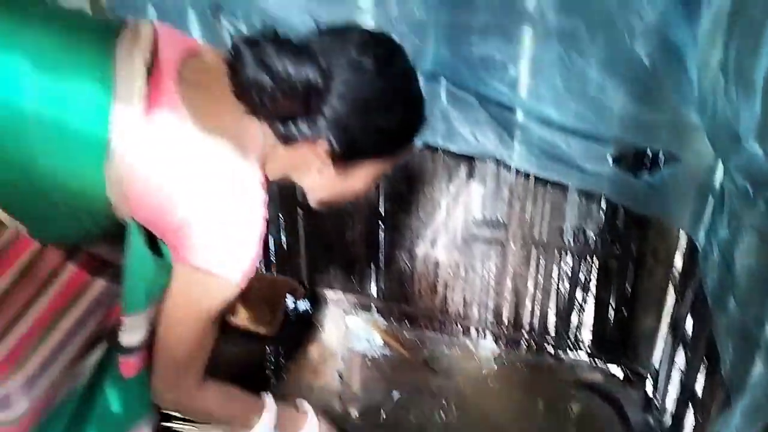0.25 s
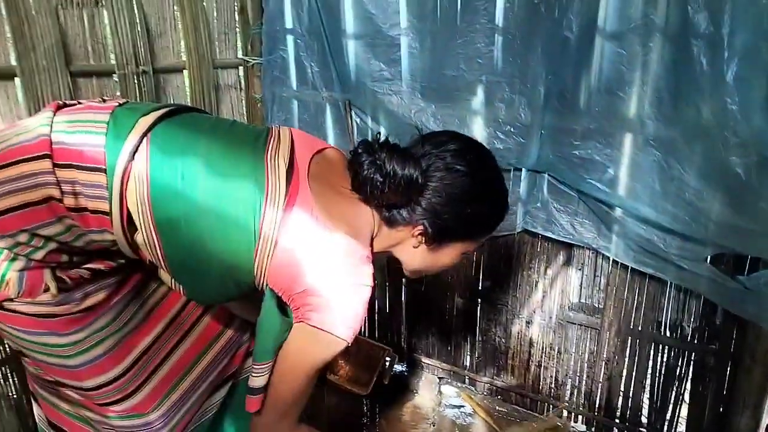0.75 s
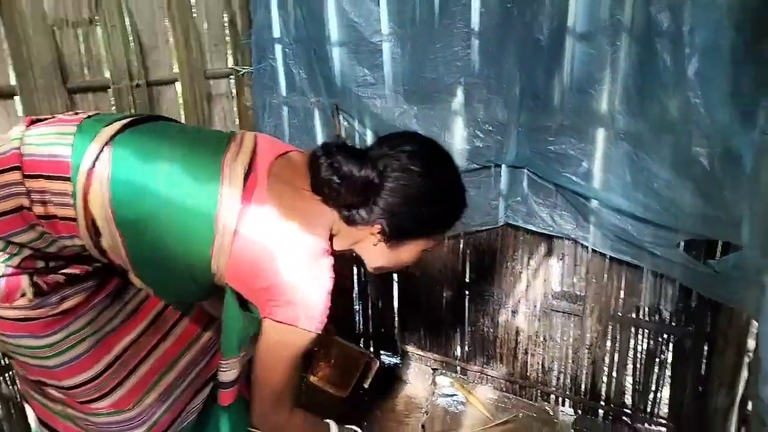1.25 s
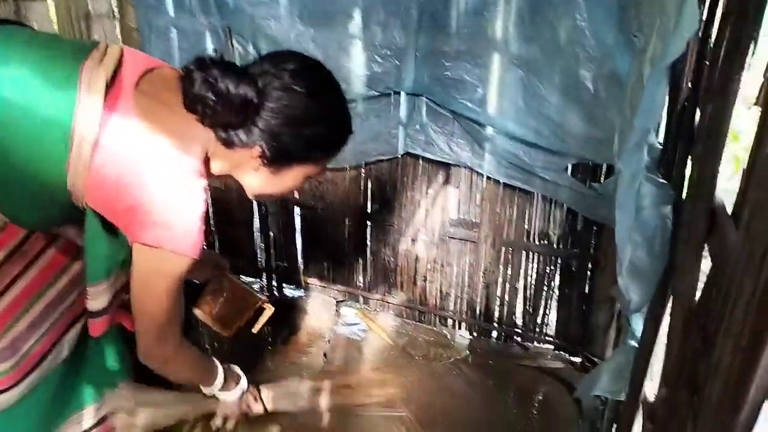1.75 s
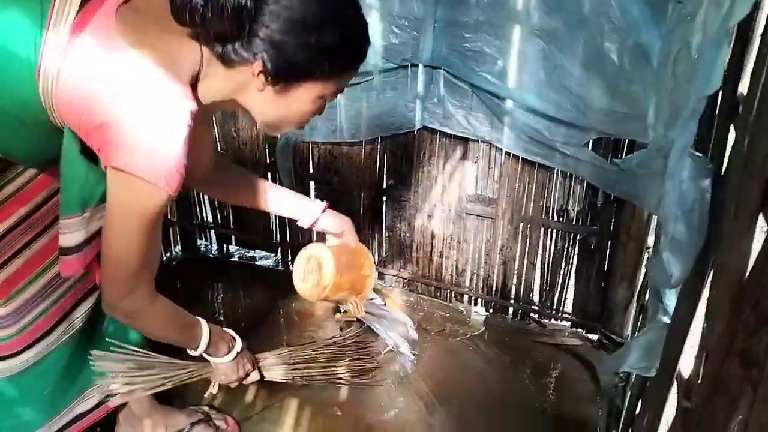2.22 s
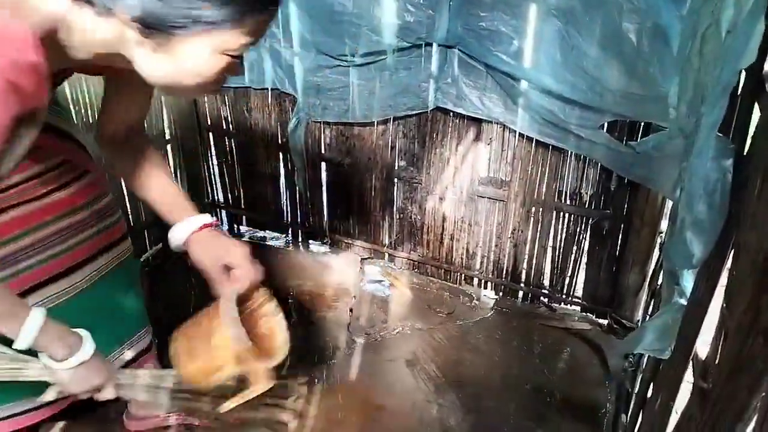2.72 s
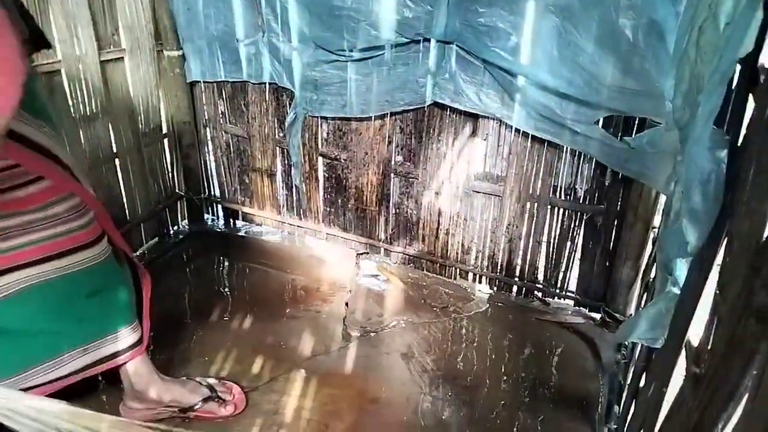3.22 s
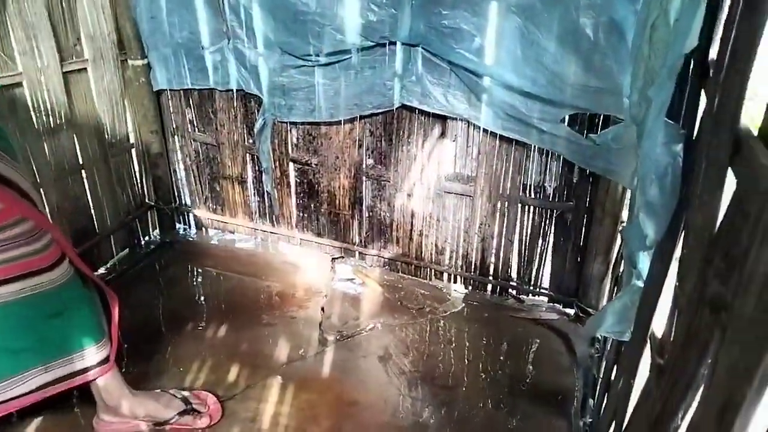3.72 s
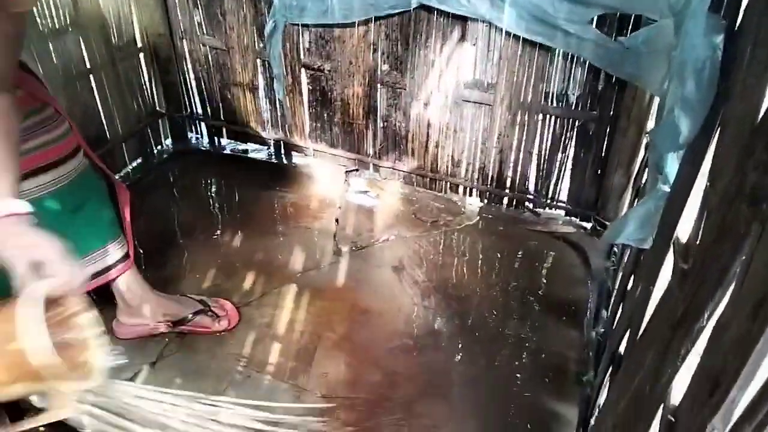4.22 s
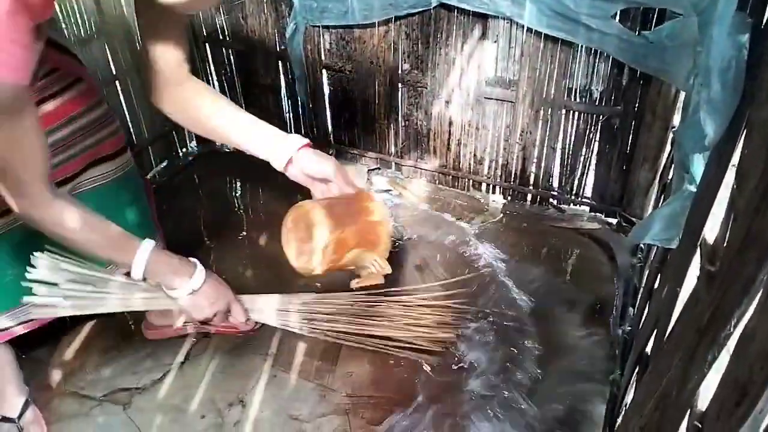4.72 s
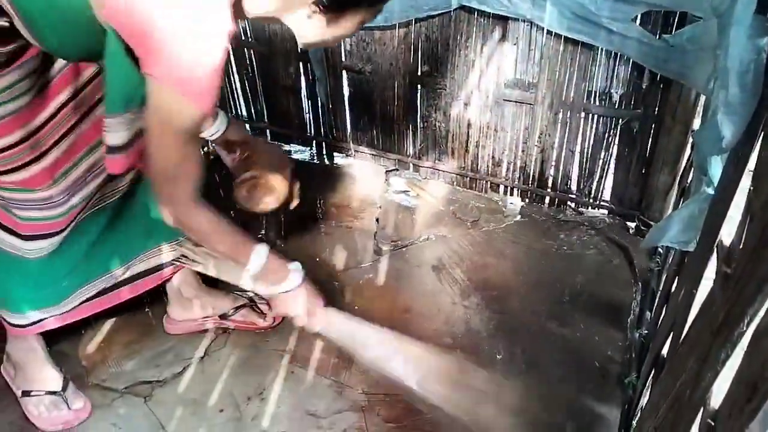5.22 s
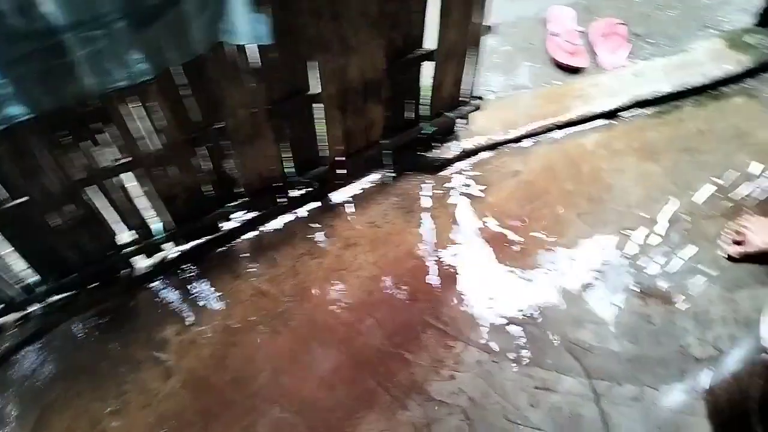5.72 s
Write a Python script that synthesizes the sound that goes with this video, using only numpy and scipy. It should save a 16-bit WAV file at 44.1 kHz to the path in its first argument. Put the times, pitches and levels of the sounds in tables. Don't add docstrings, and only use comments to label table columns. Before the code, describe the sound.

Close up in a small bamboo wash hut, a stick broom scrubs wet cement in bright, crackly swishes with squeaks and plops. It pauses while a plastic mug taps, pours, scoops and is set down with a hollow knock; then water is thrown and softer, wetter sweeping follows. A generator throbs low outside throughout. Close stereo microphone, quick fade at the end.

```python
import sys
import numpy as np
from scipy import signal
from scipy.fft import rfft, irfft, next_fast_len
from scipy.io import wavfile
from scipy.ndimage import uniform_filter1d

SR = 44100
rng = np.random.default_rng(int(sys.argv[2]) if len(sys.argv) > 2 else 0)


def undo_db(level):
    steps = np.asarray(level, float) / 20
    return 10 ** steps


def master_out(mix):
    frames = np.transpose(np.atleast_2d(mix))
    ceiling = np.clip(frames, -1, 1)
    pcm = np.round(ceiling * 32767).astype(np.int16)
    wavfile.write(sys.argv[1], SR, pcm)


N = 263056

STEP_S = .001


def rms_one(x):
    return x / np.sqrt(np.mean(x ** 2) + 1e-20)


def in_time(rows):
    s, *columns = np.transpose(rows)
    return [np.interp(np.arange(N) / SR, s, c) for c in columns]


def colour(x, points, size=4096):
    hz, db = np.transpose(points)
    grid = np.maximum(np.arange(size // 2 + 1) * SR / size, 1)
    cepstrum = irfft(np.log(undo_db(np.interp(np.log(grid), np.log(hz), db))))
    cepstrum[1:size // 2] *= 2
    cepstrum[size // 2 + 1:] = 0
    response = irfft(np.exp(rfft(cepstrum)))
    return signal.fftconvolve(np.atleast_2d(x), response[None], axes=1)[:, :N]


def drift(rate):
    r = np.exp(-2 * np.pi * rate / SR)
    noise = rng.standard_normal(N + 20000)
    return rms_one(signal.lfilter([1], [1, -2 * r, r * r], noise)[20000:])


def band(x, low_hz, high_hz):
    return rms_one(signal.sosfilt(signal.butter(2, [low_hz, high_hz], "band", fs=SR, output="sos"), x))


def grains(per_s, spread_db):
    sizes = undo_db(spread_db * np.minimum(rng.exponential(1, N), 5)) * rng.choice([-1, 1], N)
    return sizes * (rng.random(N) < per_s / SR)


def ring(clicks, hz, t60):
    r, w = undo_db(-60 / (t60 * SR)), 2 * np.pi * hz / SR
    return signal.lfilter([0, np.sin(w)], [1, -2 * r * np.cos(w), r * r], clicks + 1e-18)


def add(out, s, sound):
    i = round(s * SR)
    out[..., i:i + sound.shape[-1]] += sound[..., :N - i]


def pair(likeness):
    mid, side = rng.standard_normal((2, N))
    return np.sqrt(1 + likeness) * mid + np.sqrt(1 - likeness) * side * np.array([[1], [-1]])


def patchy(x, spread_db):
    _, _, cells = signal.stft(x, nperseg=256)
    field = rng.standard_normal(cells.shape[1:])
    for size, axis in ((5, 0), (5, 0), (9, 1), (9, 1)):
        field = uniform_filter1d(field, size=size, axis=axis)
    return signal.istft(cells * undo_db(spread_db * rms_one(field)), nperseg=256)[1][:, :N]


def lag(x, seconds):
    keep = np.exp(-STEP_S / seconds)
    return signal.lfilter([1 - keep], [1, -keep], x)


def background():
    # pitch_hz, density_db (per Hz)
    air_colour = [(18, -53), (30, -13), (80, -16), (124, 5), (153, 33.5), (209, 3), (300, 3), (388, -28.5),
                  (543, -71), (1700, -33), (1980, -23), (7600, -69), (9340, -21), (13100, -65),
                  (14500, -84)]
    far = colour(pair(0.033), [(300, -30), (420, -5), (421, 8.5)])
    air = undo_db(-49.5) * rms_one(colour(far, air_colour)) * undo_db(1.0 * drift(23))
    rumble = undo_db(-47.0) * band(band(pair(0.17), 58, 314), 58, 314)
    insect_hz, insect_width_hz, insect_db = 9000, 920, -53
    low_hz, high_hz = insect_hz - insect_width_hz / 2, insect_hz + insect_width_hz / 2
    chorus = band(rng.standard_normal(N), low_hz, high_hz)
    return air + rumble + undo_db(insect_db) * chorus * undo_db([[3], [-10]])


def generator():
    # multiple (of the firing rate), level_db
    harmonics = [(1, -32), (2, -16), (3, -19), (4, -19), (5, -9), (6, 0), (7, -8), (8, -19), (9, -12),
                 (10, -18), (11, -12), (12, -14), (13, -17), (14, -26), (15, -31)]
    # time_s, level_db
    throb = [(0.0, -35.5), (0.11, -37), (0.48, -36), (0.78, -38.5), (0.81, -36.5), (1.39, -37.5),
             (1.41, -36.5), (2.57, -34.5), (4.47, -34.5), (5.14, -35.5), (5.83, -36.5), (5.88, -46),
             (5.96, -52)]
    # time_s, firing_late_s
    late = [(.1, .0037), (.45, .0037), (1.0, .0005), (1.5, 0), (1.9, .0013), (2.4, .0007), (2.8, .0013),
            (4.9, .0016), (5.8, .0002)]
    firing_hz, first_s = 24.95, .0335
    hunt_s, hunt_period_s, hunt_latest_s = .0008, 1.55, 2.72
    at = np.arange(first_s - 1 / firing_hz, N / SR, 1 / firing_hz)
    hunting = hunt_s * np.cos(2 * np.pi * (at - hunt_latest_s) / hunt_period_s)
    at = at + hunting
    at = at + np.interp(at, *np.transpose(late))
    luck = rng.standard_normal((len(at), 2))
    pulses = np.zeros(N)
    firings = np.clip((at + .0002 * luck[:, 0]) * SR, 0, N - 1).astype(int)
    pulses[firings] = -undo_db(0.4 * luck[:, 1])
    exhaust = colour(pulses, [(k * firing_hz, db) for k, db in harmonics] + [(900, -80)], size=32768)

    size = next_fast_len(N + SR // 10, True)
    hz = np.arange(size // 2 + 1) * SR / size
    reflected_from_hz, reflected_lag_s = 237, .014
    upper = np.clip((hz - reflected_from_hz) / 16 + .5, 0, 1)
    paths = 1 - upper + upper * np.exp(-2j * np.pi * hz * reflected_lag_s)
    chamber_hz, chamber_width_hz = 300, 60
    chamber = np.exp(-2j * np.arctan2(chamber_width_hz * hz, chamber_hz ** 2 - hz ** 2))
    half_beat = .42
    beat = 1 - 1j * half_beat * np.exp(-1j * np.pi * hz / firing_hz)
    beat = beat * np.exp(-.4j) / np.hypot(1, half_beat)
    paths = paths * np.where((hz > 190) & (hz < 310), beat, 1)
    exhaust = irfft(rfft(exhaust, size) * paths * chamber, size)[:, :N]
    return undo_db(in_time(throb)[0]) * rms_one(exhaust) * undo_db([[.5], [-.5]])


def hut(x):
    t60_s = 0.1
    t = np.arange(SR // 3) / SR
    tail = rng.standard_normal((2, len(t))) * undo_db(-60 * t / t60_s) * (t > .004)
    tail = signal.lfilter([.5], [1, -.5], tail)
    tail = tail / np.sqrt(np.sum(tail ** 2, axis=1, keepdims=True))
    return signal.fftconvolve(x, tail, axes=1)[:, :N]


def mug():
    # pitch_hz, level_db, t60_s
    modes = [(496, 0, 0.11), (560, 1, 0.11), (900, -18, .04), (1642, -22, .06), (2040, -18, .05),
             (2715, -4, 0.024)]
    at_s, level_db, bounce_s, bounce_db = 3.6062, -20.5, .0138, -3
    blow = np.zeros(N)
    add(blow, at_s, np.hanning(22) / 10)
    add(blow, at_s + bounce_s, undo_db(bounce_db) * np.hanning(60) / 30)
    body = sum(undo_db(db) * ring(blow, hz, t60) for hz, db, t60 in modes)
    return undo_db(level_db) * signal.sosfilt(signal.butter(3, 380, "high", fs=SR, output="sos"), body)


def knocks():
    # start_s, peak_db, centre_hz, t60_s
    taps = [(2.384, -23, 784, 0.013), (2.39, -21, 795, 0.0063), (2.426, -34, 790, 0.012),
            (4.25, -32.5, 820, 0.011), (4.309, -29, 800, 0.0056)]
    out, click = np.zeros(N), np.r_[np.hanning(16) / 7, np.zeros(SR // 20)]
    for s, db, hz, t60 in taps:
        overtone = 0.16 * ring(click, 2.78 * hz, t60 / 2)
        add(out, s, undo_db(db + 0.5) * (ring(click, hz, t60) + overtone))
    return out


def plops():
    # start_s, peak_db, pitch_hz, t60_s
    stick_plops = [(.0245, -24, 2750, .039), (.037, -25, 3100, 0.04), (.0594, -18.5, 3510, .06),
                   (.159, -25, 2850, 0.04), (.16, -28, 3800, .03), (1.0191, -35, 2000, .04),
                   (1.098, -24, 3570, .04), (1.909, -24, 3390, 0.04), (4.6723, -28, 2240, .036),
                   (4.7441, -24, 2960, .033), (4.777, -24, 2000, 0.057), (4.8294, -25, 1360, .069),
                   (4.8846, -16, 2360, 0.073), (5.025, -29, 3380, 0.061), (5.4894, -22.5, 2420, 0.058),
                   (5.689, -21.5, 1730, .086), (5.7194, -22, 2170, .043), (5.8294, -29, 1530, 0.036),
                   (5.8621, -35, 1960, 0.068)]
    # start_s, peak_db, pitch_hz, t60_s, roughness (0-1)
    gurgles = [(.9682, -14.5, 1560, 0.021, .1), (2.561, -41, 1110, .06, .15), (2.675, -36, 754, 0.11, .02),
               (3.501, -27, 423, .09, 0.2), (3.503, -34, 872, .06, .3), (.961, -30, 1500, .02, .3),
               (3.531, -28, 873, .069, 0.5), (3.635, -32, 480, 0.1, .4), (3.734, -37.5, 453, 0.085, 0.7),
               (3.9, -41, 840, 0.13, .6), (3.994, -42, 1190, .052, 0.2), (4.01, -25, 1080, 0.04, 0.3),
               (4.066, -40, 1026, .082, .1), (5.245, -35, 490, 0.11, 0.28), (5.269, -38, 1020, 0.065, 0.5),
               (5.754, -37, 653, .11, .02), (5.762, -28.5, 1010, 0.073, 0.4),
               (5.779, -40.5, 1170, 0.067, .3)]
    # start_s, peak_db, pitch_hz, t60_s, left_right_db
    drips = [(2.4974, -20, 2050, 0.04, -4), (2.6743, -33, 2290, .064, 3), (3.0794, -40, 3400, .05, -.5),
             (3.496, -34, 1330, .03, -1), (3.503, -33, 2020, .04, 0), (3.497, -34, 2530, .04, 0),
             (3.5254, -30, 2310, .069, 3), (3.5753, -35, 1800, 0.098, 12), (3.5947, -33, 2370, .056, 1.5),
             (3.6294, -39, 2006, .07, 14), (3.8302, -33.5, 2000, .05, 8), (3.92, -34, 2620, .047, -1),
             (3.988, -25, 2300, .042, 2), (2.499, -28, 2600, 0.03, -2), (4.5431, -29, 3250, 0.025, 1.5)]
    rows = [(*row[:4], -2, row[4]) for row in gurgles]
    rows += [(*row, 0.39) for row in drips]
    rows += [(*row, 1.5, 0.43) for row in stick_plops]
    out, t = np.zeros((2, N)), np.arange(SR // 5) / SR
    for s, db, hz, t60, pan_db, rough in rows:
        t60, rough = np.clip(t60, .012, .14), np.clip(rough, 0, 1)
        tone = np.sin(2 * np.pi * hz * t * (1 + 0.094 * t / t60))
        noise = rng.standard_normal((2, len(t)))
        cluster = band(noise, hz / (1.19 + 0.15 * rough), hz * (0.94 + 0.74 * rough))
        swell = (1 - np.exp(-t / 0.00059)) * undo_db(-60 * t / t60)
        level = undo_db(db + 1.0 + np.array([[.5], [-.5]]) * pan_db)
        add(out, s, level * swell * ((1 - rough) * tone + rough * cluster))
    return out


def squeaks():
    # start_s, length_s, level_db,
    # first_pitch_hz, last_pitch_hz
    whistles = [(.012, .05, -27, 2600, 3500), (.016, .025, -28, 1650, 1700), (.065, .04, -25, 6500, 6400),
                (.068, .014, -26, 5750, 5800), (.112, .036, -27, 3200, 3650), (.127, .022, -31, 2450, 2600),
                (.195, .065, -39, 2450, 2100), (.455, .02, -33, 3000, 3050), (.465, .035, -29, 3600, 3800),
                (.58, .055, -26, 3100, 4300), (.946, .02, -30, 3800, 3400), (1.018, .03, -31, 2050, 2000),
                (1.019, .018, -35, 3400, 3500), (1.037, .05, -35, 2500, 3100),
                (1.036, .062, -31, 1850, 2100), (1.17, .055, -24, 3100, 3700),
                (1.332, .025, -30, 2900, 3600), (1.89, .05, -30, 2150, 2500), (1.9, .03, -26, 3300, 3500),
                (2.005, .045, -42, 1200, 1250), (2.155, .05, -31, 225, 240), (2.47, .022, -35, 4200, 4100),
                (3.572, .015, -38, 1500, 1500), (3.59, .012, -35, 1550, 1600), (4.0, .014, -31, 820, 950),
                (4.018, .022, -33, 1050, 800), (4.027, .025, -38, 1800, 2200),
                (4.052, .024, -32, 2400, 2000), (4.065, .015, -40, 1500, 1500),
                (4.075, .014, -36, 2250, 2250), (4.598, .02, -38, 3400, 4100),
                (4.685, .03, -32, 1150, 1250), (4.79, .03, -26, 3300, 2700), (4.89, .015, -28, 3450, 3500),
                (5.16, .025, -36, 1400, 1550), (5.245, .045, -36, 3000, 3050), (5.59, .03, -34, 1200, 1300),
                (5.688, .035, -29, 1300, 1500), (5.79, .02, -30, 1450, 1500), (5.89, .03, -43, 1400, 1350),
                (5.86, .07, -40, 195, 190), (5.93, .05, -45, 128, 128)]
    width, rise = .2, .2
    out = np.zeros((2, N))
    for s, length, db, first_hz, last_hz in whistles:
        u = np.linspace(0, 1, int(np.clip(length, .005, .2) * SR))
        knots = rng.standard_normal((2, 2, 80))
        at = u * min(length * first_hz * width, 79)
        flutter = [[np.interp(at, np.arange(80), k) for k in side] for side in knots + knots[0]]
        flutter = np.array(flutter) / 2
        steady = 600 / first_hz
        turn = np.cumsum(first_hz + (last_hz - first_hz) * u) * 2 * np.pi / SR
        shape = np.sqrt(np.clip(np.minimum(u / rise, (1 - u) / .5), 0, 1))
        whistle = (steady + 2 * flutter[:, 0]) * np.sin(turn) + 2 * flutter[:, 1] * np.cos(turn)
        add(out, s, undo_db(db - 12.5) * shape * whistle)
    return out


def snaps():
    # start_s, peak_db, centre_hz, t60_s, tick_share (0-1)
    bursts = [(0.458, -28, 9000, 0.13, 0.2), (0.946, -25, 8600, 0.054, 0.26),
              (0.9528, -28, 3460, 0.045, 0.37), (1.1237, -29, 9740, 0.06, 0.5),
              (1.6756, -32, 6600, 0.1, 0.3), (1.695, -20, 8850, 0.085, 0.44),
              (2.2877, -42, 9070, 0.06, 0.4), (2.4684, -28.5, 8850, 0.095, 0.43),
              (2.7003, -29.5, 8900, 0.084, 0.53), (3.495, -32, 3280, 0.06, 0.6),
              (3.5212, -33, 3700, 0.15, 0.48), (3.605, -28, 3700, 0.072, 0.35),
              (3.9038, -33.5, 7750, 0.074, 0.63), (4.0752, -32.5, 6800, 0.059, 0.4),
              (4.2006, -41, 8770, 0.06, 0.4), (4.2507, -40.5, 3670, 0.055, 0.3),
              (4.3104, -48.5, 9320, 0.049, 0.5), (4.3676, -23, 4400, 0.04, 0.5),
              (0.967, -33, 3400, .03, .3), (2.675, -40, 2500, .04, .4), (4.4975, -43.5, 9300, 0.072, 0.5),
              (4.621, -36, 5500, 0.13, 0.2), (5.1382, -33, 10700, 0.06, 0.5)]
    out, t = np.zeros((2, N)), np.arange(SR // 5) / SR
    for s, db, hz, t60, tick in bursts:
        noise = rng.standard_normal((2, len(t)))
        bright = band(noise, 1960, 10700) + 0.92 * band(noise, 0.85 * hz, 1.18 * hz)
        dying = (1 - np.clip(tick, 0, 1)) * undo_db(-60 * t / np.clip(t60, .008, .2))
        dying = dying + 2 * tick * np.exp(-((t - .002) / 0.00019) ** 2)
        add(out, s, undo_db(db + 0.5) * bright * dying * (1 - np.exp(-t / 0.0009)))
    return out


def swell_of(s, db, rise_s, fall_s):
    roundness = 1.07
    t = np.arange(0, N / SR, STEP_S) - s
    return undo_db(2 * (db - 20 * np.where(t < 0, -t / rise_s, t / fall_s) ** roundness))


def motion():
    # peak_s, hiss_db, rise_20db_s, fall_20db_s, water_db (re hiss)
    sweeps = [(.029, -23.5, .424, .106, -1.7), (.075, -20.5, .043, .16, -9.6),
              (.481, -26.4, .046, .192, -13.3), (.592, -14, .09, .17, -13.7),
              (1.104, -17.5, .024, .165, -14), (1.211, -18.3, .112, .059, -12),
              (1.263, -23.5, .103, .06, -12), (1.339, -30.7, .074, .139, -5),
              (1.705, -20.7, .024, .108, -11), (1.779, -19, .043, .133, -13.9),
              (1.852, -21.3, .14, .074, -15.4), (1.918, -24, .048, .085, -6),
              (5.174, -31.3, .093, .041, -2.3), (5.239, -33.1, .027, .863, -5.9),
              (5.332, -27.4, .035, 1.267, -25.3), (5.493, -28.2, .169, .16, 4), (5.676, -25, .5, .07, -5)]
    # peak_s, slosh_db, rise_20db_s, fall_20db_s, pitch_hz
    splashes = [(1.04, -46, .02, .3, 2200), (2.504, -36, .02, .027, 2300), (2.573, -43.1, .021, .038, 1400),
                (2.682, -42, .067, .171, 2860), (3.118, -37.6, .197, .038, 2260),
                (3.501, -41.4, .016, .212, 2310), (3.625, -37.5, .086, .021, 2100),
                (3.884, -46, .113, .45, 2380), (4.035, -42, .072, .042, 1110),
                (4.075, -40.7, .104, .013, 2000), (4.376, -45, .015, .05, 3900),
                (4.535, -45, .08, .15, 3200), (4.677, -30, .03, .382, 2200),
                (4.811, -26.4, .192, .132, 2300), (5.028, -36.5, .094, .029, 3500),
                (5.725, -27.5, .3, .143, 2200), (5.795, -32, .111, .07, 1670)]
    # peak_s, hiss_db, rise_20db_s, fall_20db_s
    sprays = [(2.475, -32, .014, .07), (2.712, -37.8, .065, .109), (2.948, -40.2, .137, .564),
              (3.04, -48.6, 2.004, .312), (3.535, -43.1, .063, .257), (4.05, -49.7, .785, .36),
              (4.655, -33.5, .085, .338), (4.866, -37, .067, .198), (4.946, -32, .325, .128),
              (5.074, -36.1, .013, .053)]
    # time_s, level_db
    close = [(5.8, 0), (5.89, -19), (5.96, -32)]
    broom_hz, still_hz = 3394, 1903
    pushes = pushed = splashed = pitched = landing = 0
    for s, db, rise_s, fall_s, wet_db in sweeps:
        push = swell_of(s, db, rise_s, fall_s)
        pushes = pushes + push
        pushed = pushed + undo_db(2 * wet_db) * push
        if rise_s < .03:
            landing = landing + swell_of(s, db, rise_s, .1)
    for s, db, rise_s, fall_s, hz in splashes:
        splash = swell_of(s, db, rise_s, fall_s)
        splashed = splashed + splash
        pitched = pitched + splash * np.log(hz)
    drain = undo_db(2 * -23.8) * lag(pushes, .128)
    spray = sum(swell_of(*row) for row in sprays) + undo_db(2 * -8) * splashed
    hiss = pushes + spray + drain + undo_db(2 * -66)
    still = undo_db(2 * -52.8)
    water = pushed + splashed + still
    centre_hz = np.exp((pitched + pushed * np.log(broom_hz) + still * np.log(still_hz)) / water)
    wash = undo_db(2 * -18) * splashed + undo_db(2 * -33) * pushes + undo_db(2 * -27) * landing + undo_db(2 * -58.5)
    levels_db = 10 * np.log10(np.c_[hiss, water, wash])
    curves = np.c_[np.arange(len(hiss)) * STEP_S, levels_db, centre_hz]
    hiss_db, slosh_db, wash_db, centre_hz = in_time(curves)
    close_db, = in_time(close)
    return hiss_db + close_db, slosh_db + close_db / 2, wash_db + close_db / 2, centre_hz


def bubbles(centre_hz, per_s, cycles, spread_db):
    left_lag = 12
    out, t = np.zeros((2, N)), np.arange(SR // 16) / SR
    for when, octave, size, life, side in rng.random((2000, 5))[:int(per_s * N / SR)]:
        hz = np.clip(centre_hz[int(when * N)] * 2 ** (1.5 * (octave - .5)), 900, 5000)
        t60 = cycles * (0.19 + 1.44 * life) / hz
        whistle = np.sin(2 * np.pi * hz * t * (1 + 0.051 * t / t60))
        whistle = whistle * (1 - np.exp(-t / 0.0024)) * undo_db(-60 * t / t60)
        placed = np.array([np.roll(whistle, left_lag), whistle])
        placed = placed * undo_db(13 * (side - .5) * np.array([[1], [-1]]))
        add(out, when * N / SR, placed * undo_db(-spread_db * np.log(size + 0.0082)))
    return rms_one(out)


def slosh(slosh_db, wash_db, centre_hz):
    # pitch_hz, density_db (per Hz)
    rush_colour = [(530, -32), (900, -17.5), (1370, -6), (1520, -8), (2410, 0.5), (2870, -5), (3330, -1),
                   (6000, -11), (7800, -35), (13200, -120)]
    white, swell = pair(0.079), 0
    for hz in np.geomspace(1100, 4500, 8):
        near = np.exp(-.5 * (np.log2(hz / centre_hz) / .5) ** 2)
        swell = swell + near * band(white, hz / 1.135, hz * 1.134) * undo_db(2.1 * drift(16.6))
    rush = rms_one(colour(pair(.1) * undo_db(1.85 * drift(20)), rush_colour))
    wash = band(pair(.8) * undo_db(3.2 * drift(26)), 517, 1770)
    fizz = bubbles(centre_hz, 180, cycles=90, spread_db=3)
    water = 0.72 * rush + 0.52 * fizz + 0.54 * rms_one(swell)
    return undo_db(slosh_db) * water + undo_db(wash_db) * wash


def bristles(hiss_db):
    # pitch_hz, density_db (per Hz)
    stick_colour = [(1470, -23), (2500, -14), (3160, -3.5), (5820, -6.5), (6650, -3.5), (7870, -0.5),
                    (9060, 1), (11400, -1.5), (14500, -9.5)]
    slips = np.abs(signal.lfilter([1], [1, -.9], grains(600, spread_db=3)))
    flicker = undo_db(1.1 * drift(16) + 0.69 * drift(120)) * (1 + 0.033 * rms_one(slips))
    scrub = colour(pair(0) * flicker, stick_colour)
    return undo_db(hiss_db) * rms_one(patchy(scrub, spread_db=0.9))


def scene():
    # time_s, level_db
    air_fade = [(0, -4), (5.8, -1), (5.9, -16), (5.96, -2)]
    hiss_db, slosh_db, wash_db, centre_hz = motion()
    hits = plops() + snaps() + knocks() + mug() + squeaks()
    work = bristles(hiss_db) + slosh(slosh_db, wash_db, centre_hz)
    near = work + hits + undo_db(-13.5) * hut(hits)
    return near + background() * undo_db(in_time(air_fade)[0]) + generator()


def band_limit(x):
    return signal.sosfilt(signal.butter(12, 15280, fs=SR, output="sos"), x)


def record(dry):
    # pitch_hz, left_db, right_db
    ports = [(295, 2.5, 1.5), (3500, 0.5, -0.5), (5270, -1, 4), (6000, 1, 5), (6780, -15, 8.5),
             (7460, -2.5, 0.5), (8330, 3, -11.5), (8840, 3.5, -21.5), (9850, 2, -12.5), (12100, 3.5, -1.5),
             (14200, -0.5, 1.5)]
    hz, left_db, right_db = np.transpose(ports)
    left = colour(dry[0], np.c_[hz, left_db], size=1024)
    right = colour(dry[1], np.c_[hz, right_db], size=1024)
    steep = signal.ellip(14, .5, 70, 14280, fs=SR, output="sos")
    mix = signal.sosfilt(steep, np.vstack([left, right]))
    return band_limit(mix)


dry = scene()
out = record(dry)
master_out(out)
```